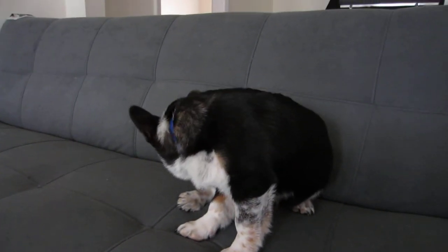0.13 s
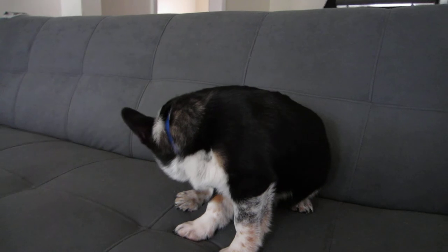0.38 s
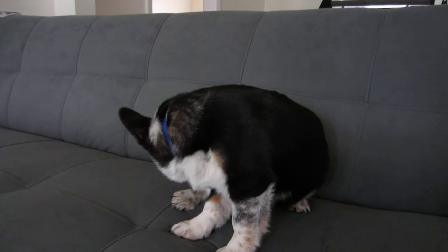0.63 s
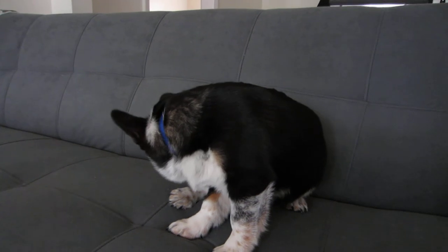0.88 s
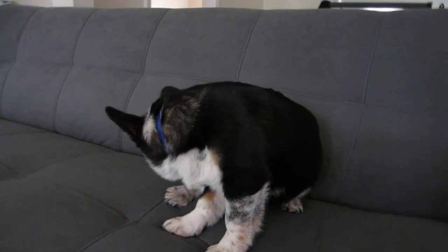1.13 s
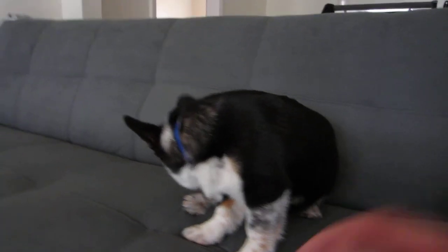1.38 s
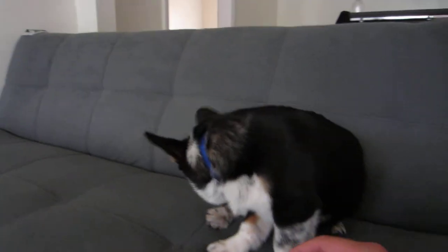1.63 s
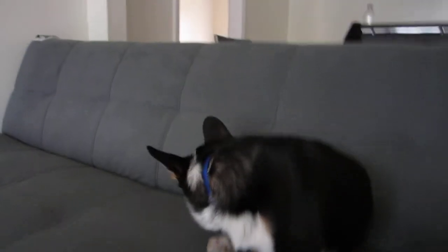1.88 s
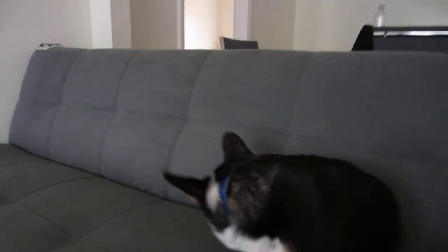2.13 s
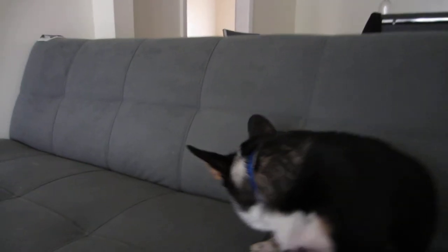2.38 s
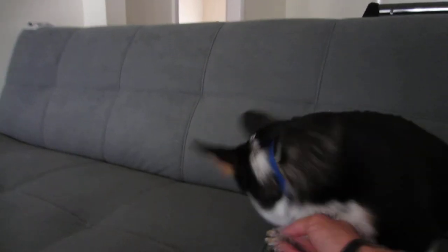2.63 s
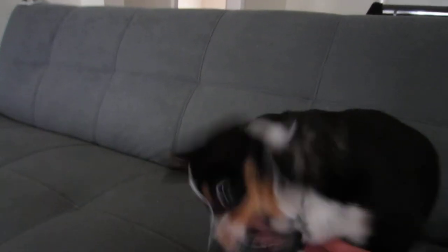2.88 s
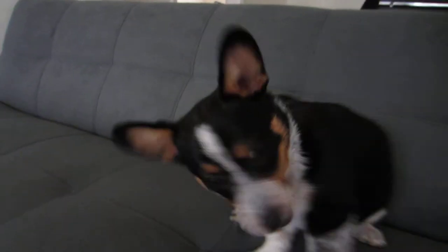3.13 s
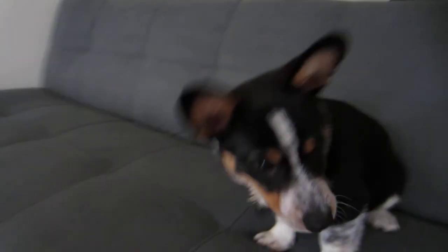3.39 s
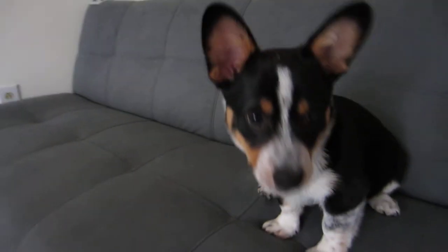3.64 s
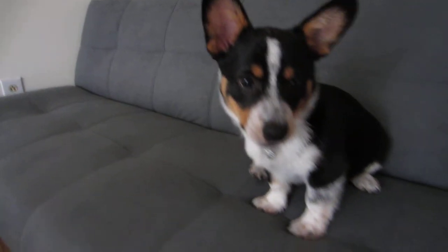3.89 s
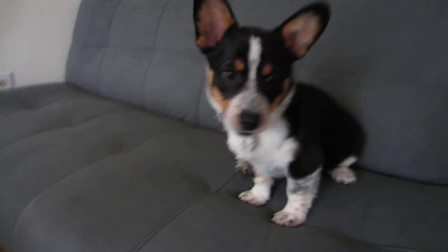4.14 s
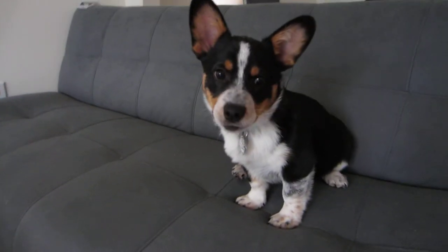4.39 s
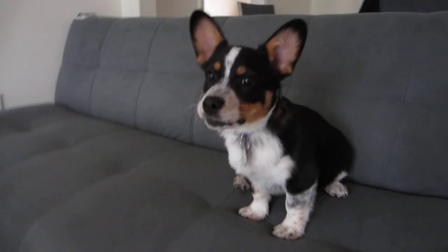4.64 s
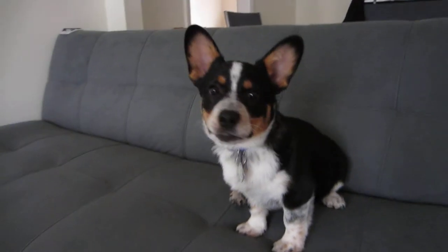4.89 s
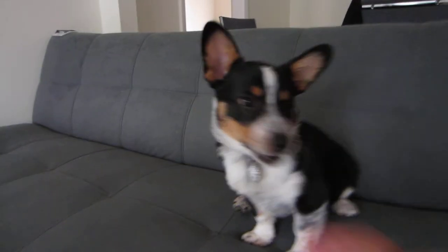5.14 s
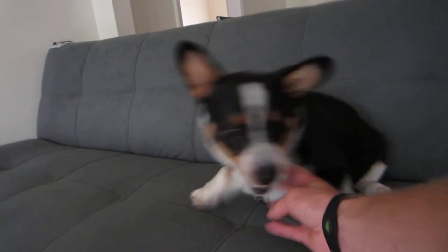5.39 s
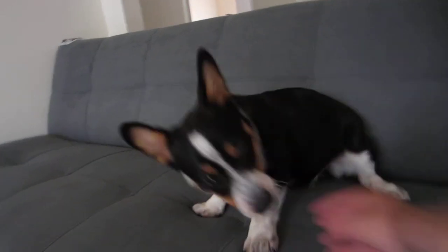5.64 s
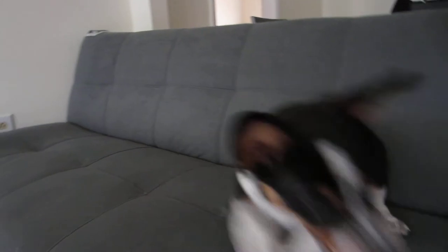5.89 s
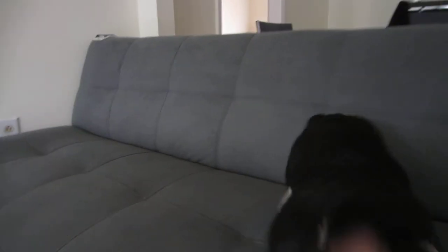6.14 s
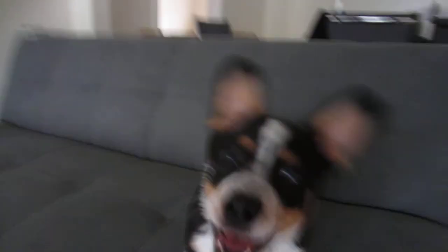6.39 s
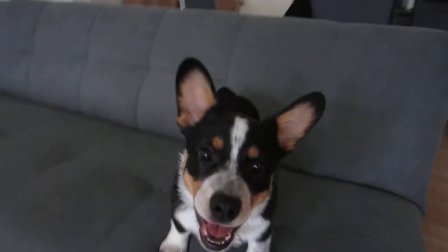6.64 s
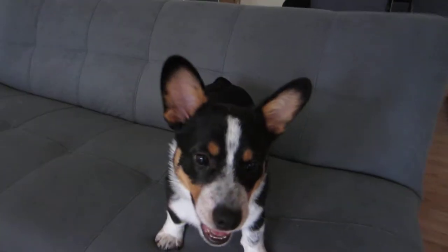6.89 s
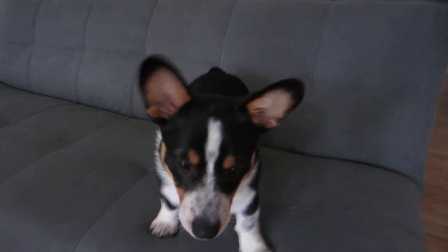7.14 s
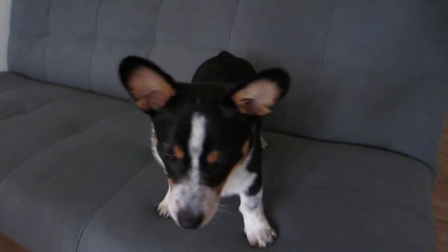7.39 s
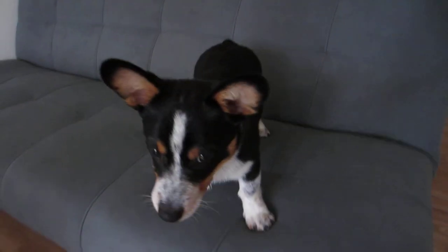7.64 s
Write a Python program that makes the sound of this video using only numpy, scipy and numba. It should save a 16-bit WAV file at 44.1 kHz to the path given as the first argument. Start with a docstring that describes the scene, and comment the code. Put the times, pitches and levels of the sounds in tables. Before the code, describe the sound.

Sharp, very loud hollow clicks break a quiet, faintly humming room, then a puppy romps on a sofa with thumps, tag jingles, huffs and two faint hoarse yips.

```python
"""First a quiet living room with a faint hum, then sharp hollow clicks: a puppy romps on a fabric sofa,
close to a small stereo camera. Cavity tones make the clicks, ringing modes the thumped cushions and the
collar tag. Jittered pulses and breath make two hoarse yips, whines and huffs; filtered noise rustles as
cloth and fur. The room answers with dense reflections, and low rumble comes from handling the camera."""
import sys
import numpy as np
from scipy import signal
from scipy.fft import rfft, irfft
from scipy.io import wavfile
from scipy.ndimage import uniform_filter1d
from numba import njit

SR = 44100
rng = np.random.default_rng(int(sys.argv[2]) if len(sys.argv) > 2 else 0)


def unload_audio(sound):
    """Save the sound as a 16-bit wav file, at the path given as the first command line argument."""
    columns = np.transpose(np.atleast_2d(sound))
    # keep every value between -1 and 1, then stretch to whole-number steps
    steps = np.round(np.clip(columns, -1, 1) * 32767)
    wavfile.write(sys.argv[1], SR, steps.astype(np.int16))


def how_loud(loudness_db):
    """Turn decibels into a plain amplitude multiplier (0 dB gives 1, 20 dB gives 10)."""
    steps = np.asarray(loudness_db, float) / 20
    return 10 ** steps


N = 342657
T = np.arange(N) / SR
LEFT_DB = 3  # left port over right port for most sounds

# sharp clicks: t/s, peak level/dB, low cavity f/Hz, high cavity f/Hz, high over low/dB,
# swell of the high cavity t/ms, crack/dB, echo offset/dB
CLICKS = [(0.507, -37.5, 784, 1702, -10, 0.98, -22, -6), (0.5608, -8.5, 824, 1740, -8.5, 1.34, -6.5, -2.5),
          (0.6863, 0.5, 735, 2714, 7.5, 0.44, 0.5, -3.5), (0.751, -30.5, 350, 2710, -11, 1.6, -20, 7.5),
          (0.796, -27, 377, 2140, -4, 1.5, -6.5, 3), (0.824, 0, 990, 2920, 13, 0.77, 9, 2.5),
          (0.876, -33, 575, 3100, -12, 0.84, -10, 2), (0.9317, -16.5, 762, 1810, -23, 0.64, -2.5, 7.5),
          (1.129, -24, 493, 1620, 0, 0.96, -4.5, -5), (2.114, -34.5, 1000, 1650, -27, 0.9, -24, 4),
          (2.355, -26, 586, 1957, -11, 0.75, -29, -5), (2.466, -32.5, 686, 1068, -4, 1.2, -22, -10),
          (2.633, -19.5, 860, 1720, 1, 0.5, -5, -1), (2.751, -31, 524, 1300, -3, 2.2, -21, 1),
          (2.872, -31, 606, 1680, -5, 1.6, -2, -1.5), (3.5069, -27.5, 604, 1090, -16.5, 0.8, -30, -12),
          (4.915, -22.5, 616, 1900, -3, 0.62, -26, -8), (5.092, -12.5, 455, 1570, -3, 1.28, -18, -8),
          (5.263, -29, 706, 1330, -1.5, 0.59, -4.5, 5), (5.387, -31, 1300, 1720, 5.5, 0.7, -1, 3),
          (5.686, -18.5, 1400, 3000, -9.5, 0.6, -21, 4), (5.865, -38, 682, 1000, -13, 0.91, -22, -10),
          (5.984, -18, 473, 1500, 2.5, 0.43, -8.5, -10), (6.088, -30, 493, 2090, -7.5, 1.4, -24, 0),
          (6.308, -28, 1100, 1660, 6, 0.72, -20, -14), (6.32, -21, 900, 2080, 5.5, 0.69, -5, -4),
          (6.61, -30.5, 503, 1305, -2, 2.1, -17, 1), (6.735, -19.5, 440, 3670, 1, 0.79, 2.5, -8),
          (7.144, -18.5, 1690, 2550, -3, 0.8, -6.5, -3)]
# echoes off nearby surfaces: delay t/s, level/dB before each click's offset
CLICK_ECHOES = [(.0034, -10.5), (.0068, -17), (0.0114, -23)]
# faint thin ticks: t/s, peak level/dB, f/Hz
TICKS = [(0.413, -39.5, 2920), (0.4645, -46, 6500), (0.56, -22, 10700), (0.561, -24, 15000),
         (0.65, -37.5, 3056), (0.751, -28.5, 3700), (0.8734, -32.5, 3200), (1.0983, -45, 3220),
         (1.3335, -43.5, 4930), (1.801, -48, 3220), (3.5497, -39, 3270), (4.472, -48, 5586),
         (5.094, -34.5, 9500), (5.127, -39, 2200), (5.187, -37, 1900), (5.985, -41.5, 3300),
         (6.308, -40, 5140), (6.7336, -22.5, 4800), (6.788, -39.5, 3300), (6.9326, -43.5, 3400)]
# spells of fur crackling over the cloth: from t/s, to t/s, mean peak level/dB, middle f/Hz
CRACKLES = [(0.484, 0.51, -54, 6500), (1.091, 1.133, -50, 6040), (2.762, 2.793, -51, 6030),
            (2.85, 2.935, -49, 5200)]
# blows on the cushions: t/s, peak level/dB, nominal push f/Hz, slap/dB, nominal t60/s
THUMPS = [(1.081, -32, 118.3, -19, 0.15), (1.953, -35, 428, -23.5, 0.41), (2.029, -35.5, 89, -29, 0.16),
          (2.191, -5, 260, -23.5, 0.24), (2.203, -20, 197, -35, 0.18), (3.506, -18.5, 100, -32, 0.24),
          (3.734, -19.5, 320, -27, 0.29), (4.63, -31, 246, -7, 0.61), (4.716, -35, 168, -22, 0.34),
          (4.779, -35.5, 91, -25, 0.23), (4.915, -13, 193, -35, 0.19), (4.927, -25, 190, -37.5, 0.094),
          (5.096, -18, 316, -10, 0.28), (5.272, -24.5, 203.5, -16.5, 0.072), (5.493, -35, 122, -14.5, 0.36),
          (5.864, -27.5, 260, -28, 0.14), (5.9, -34, 228, -20, 0.14), (5.926, -34, 260, -15, 0.16),
          (5.951, -28, 170, -22, 0.076), (5.959, -29, 147, -26, 0.14), (6.021, -31, 150, -23, 0.11),
          (6.03, -29.5, 146, -23, 0.095), (6.493, -25.5, 108, -25.5, 0.16),
          (6.723, -26.5, 233, -22.5, 0.26), (7.147, -26, 430, -8, 0.52)]
# modes of the sofa: f/Hz, level/dB, share of the blow's t60
SOFA_MODES = [(96.1, 2, 1.33), (150, -13, 1.3), (207.5, -5, 0.91), (233, -1.5, 1.22), (260, -7.5, 1.04),
              (295.6, -7.5, 1.53), (350, -5, 1.06), (400, -9, 0.75), (418, 8, 0.25), (526, 5.5, 0.59),
              (697, -6.5, 0.79)]
# collar tag strikes, hard on the ring or soft on fur: t/s, peak level/dB, tick/dB
TAG_STRIKES = [(2.539, -34.5, 2.5), (2.581, -32.5, 2.5), (2.636, -24.5, 5.5), (2.671, -35, 0),
               (2.783, -35.5, 10), (2.8164, -40, 3), (2.928, -50, -11), (2.9684, -44, 9),
               (5.269, -26.5, 1.5), (5.283, -34, 18), (5.3554, -40, -21), (5.3762, -33, 10),
               (5.9439, -52, -2), (6.0097, -37, -3), (6.0336, -41, -27), (6.062, -45, -20),
               (6.095, -51, -17)]
# modes of the metal disc: f/Hz, level/dB, undamped t60/s
TAG_MODES = [(5350, -16, .25), (6390, -16, .15), (7420, -11, .35), (9570, 0, .3), (9625, -2, .5),
             (10200, -12, .15), (13640, -5.5, .35)]
# yips: start t/s, attack t/s, hold t/s, level/dB, pitch f/Hz, mouth f/Hz, mouth level/dB
YIPS = [(5.687, 0.019, 0.016, -32, 463.8, 1693, 0.5), (6.17, 0.023, 0.05, -33, 449.7, 870, 0.5)]
# throat resonances: f/Hz, nominal width/Hz, level/dB
THROAT = [(480, 160, -2), (940, 220, -6), (1400, 450, -5), (1850, 350, -5), (2750, 450, -11),
          (3400, 500, -13), (4200, 600, -17)]
# breathy whines and huffs: start t/s, loudest t/s, end t/s, level/dB, resonance from f/Hz, to f/Hz
HUFFS = [(1.352, 1.578, 2.1, -61, 2750, 2670), (2.662, 2.757, 3.13, -46.5, 1490, 452),
         (3.053, 3.142, 3.34, -42.5, 1860, 503), (6.63, 6.67, 6.75, -48, 1800, 1830),
         (7.143, 7.157, 7.36, -43.5, 1960, 1480), (7.529, 7.584, 7.68, -57, 1410, 1680)]
# how much the puppy moves on the cloth: t/s, creak and cloth drive/dB, fur hiss drive/dB
MOVING = [(0.0, -62, -67), (0.55, -59.5, -59), (0.72, -53.5, -52.5), (0.931, -57.5, -69), (1.101, -62, -63),
          (1.362, -59, -58.5), (1.62, -51.5, -52.5), (2.25, -54, -58), (2.6, -52.5, -54), (2.9, -51, -52.5),
          (3.02, -56, -57), (3.46, -54.5, -58), (3.76, -54, -60.5), (4.52, -57, -58), (5.15, -56, -57.5),
          (5.558, -55, -56), (5.76, -57.5, -71), (5.91, -52, -55), (6.1, -53, -56), (6.22, -50, -51),
          (6.47, -54.5, -56.5), (7.08, -49, -61), (7.33, -58.5, -64.5), (7.77, -59.5, -63.5)]
# creak, cloth and fur hiss in turn: level at rest/dB, dB per dB of movement, drive column of MOVING
RANGES = [(-62, 1.2, 0), (-63, 1.2, 0), (-61, 1.05, 1)]
# cloth settling after a blow, for the same three ranges: level/dB under the blow's peak
SETTLE_DB = [-25.5, -33, -65]
# what the cushion passes in those ranges: points of (f/Hz, level/dB), share unlike left and right
CUSHION = [([(50, 11), (110, 3), (250, 6), (450, -1), (900, -44.5)], 0.3), ([(250, -44), (480, 5),
           (800, 6.5), (1300, 0.5), (2600, -46)], 0.3), ([(800, -37), (1400, -1), (2100, -2.5), (2800, -6),
           (3800, -14.5), (8000, -24), (12000, -53)], 0.46)]
# short low cushion creaks under shifting weight: t/s, peak level/dB, f/Hz
CREAKS = [(1.839, -35.5, 870), (1.998, -40, 365), (6.758, -33, 453), (6.83, -40, 370), (6.874, -40, 285),
          (6.904, -40, 365), (6.917, -39, 358), (6.95, -35, 236), (6.972, -44, 400), (6.997, -33, 464),
          (7.023, -32.5, 500), (7.075, -35, 384), (7.107, -36, 337), (7.178, -36, 350)]
# spells of small creaks while weight shifts: from t/s, to t/s, mean peak level/dB, middle f/Hz
CREAKING = [(1.444, 2.1, -46.5, 316)]
# how fast the room dies away: f/Hz, t60/s
ROOM_T60 = [(100, 0.49), (500, 0.54), (2000, 0.32), (8000, 0.64)]
# spectrum shape of the room noise: f/Hz, relative level/dB
AIR = [(15, -45), (25, -48), (87, -22.5), (123, -3), (175, -36), (293, -13.5), (335, -26), (1130, -17.5),
       (1230, -19), (1370, -9), (1790, -11.5), (1940, -14.5), (2990, -23.5), (7710, -27.5), (16000, -29)]
# mains hum: f/Hz, rms level/dB
HUM = [(120, -64.5)]
# low drone that sets in: t/s, peak level/dB, f/Hz
DRONE = [(6.699, -83, 196.4), (7.2, -57, 197.2), (7.77, -66, 198.5)]
# rumble from handling the camera: t/s, level/dB midway between the port gains
RUMBLE = [(0.0, -71), (1.9, -72.5), (2.15, -65), (2.36, -52), (2.52, -67), (3.4, -65), (3.7, -69),
          (4.35, -71), (5.13, -61), (5.3, -62.5), (5.82, -64), (6.05, -52), (6.25, -64), (7.25, -74),
          (7.77, -65)]
# response of the camera's microphones: f/Hz, level/dB
MIC = [(30, 6), (8000, -3.5), (10500, -11.5), (12000, -26), (13500, -13), (15500, -11.5)]


def clicks():
    """Two small cavities pop over a crack of noise, close surfaces repeat it; short noise bands tick."""
    low_swell = 1.26  # the larger cavity swells this many times slower
    port_lag_s = .00002  # the clicks lie left of the camera
    crack_spectrum = [(300, -4.5), (1000, 1.5), (2200, 7), (5000, 0.0), (7000, -8), (9000, -32.0),
                      (12000, -11.0), (16000, -35.0)]
    out = np.zeros((2, N))
    for s, db, low_hz, high_hz, bright_db, swell_ms, crack_db, echo_db in CLICKS:
        low = burst(low_hz, low_swell * swell_ms / 1000, 0.6, .04)
        high = burst(high_hz, swell_ms / 1000, 0.013, .04)
        crack = unit(colour(rng.standard_normal(len(low)), crack_spectrum))
        crack_shape = fade(0.005, 0.00015, .04) + how_loud(-10.5) * fade(0.038, 0.0026, .04)
        pop = low + how_loud(bright_db) * high + how_loud(crack_db) * crack * crack_shape
        echoes = sum(how_loud(e_db + echo_db) * np.roll(pop, int(lag * SR)) for lag, e_db in CLICK_ECHOES)
        add(out, s - .0006, pop + echoes, db, 4, port_lag_s)
    crackle = spells(CRACKLES, gap_s=.0025, uneven=1.0, spread_db=4, spread_pitch=0.53)
    for s, db, hz in list(TICKS) + crackle:
        tick = band(rng.standard_normal(800), hz, 1500) * fade(0.0079, 0.00045, 1)[:800]
        add(out, s, tick, db, 4.5)
    return out


def burst(hz, peak_s, glide, length):
    """A cavity tone swells to its peak and is choked off; its pitch rises as the cavity changes."""
    u = np.arange(int(length * SR)) / SR / peak_s
    cycles = hz * peak_s * (u + glide * (u * u / 4 - u / 2))
    return u ** 2 * np.exp(2 - 2 * u) * np.sin(2 * np.pi * cycles)


def thumps():
    """A one-cycle push and a slap, then the frame and cushions of the sofa ring on."""
    wobble_db, wobble_rad = 4, .9  # loose padding shakes each mode in level and phase
    ringing_db = -8  # frame against the push
    cloth_spectrum = [(300, 4.0), (900, 9), (2300, 1.0), (3300, -19.0), (7000, -21.5), (10000, -72)]
    out = np.zeros((2, N))
    for s, db, hz, slap_db, t60 in THUMPS:
        push = ring(1.29 * hz, 3 / hz, 0.04 / hz, 0, .6)
        body = np.zeros(len(push))
        for mode_hz, mode_db, share in SOFA_MODES:
            a, b = rng.standard_normal(2)
            shake = walk(89.4, len(push))
            # a push drives the modes near its own nominal pitch hardest
            drive_db = mode_db - 7.1 * abs(np.log2(mode_hz / hz)) + a
            phase = 3 * b + wobble_rad * shake[::-1]
            mode = ring(mode_hz * (1 + 0.017 * b), t60 * share, 0.00088, phase, .6)
            body += how_loud(drive_db + wobble_db * shake) * mode
        cloth = unit(colour(rng.standard_normal(len(push)), cloth_spectrum))
        # the slap is a short smack with a dense tail from the padding
        slap = cloth * (3 * fade(0.012, 0.000076, .6) + how_loud(-1.0) * fade(1.24 * t60, 0.0095, .6))
        body = how_loud(ringing_db) * body / np.max(np.abs(body))
        add(out, s, push / np.max(push) + body + how_loud(slap_db) * slap, db, LEFT_DB)
    return out


def tag():
    """Each strike ticks and rings the small metal disc, which flickers as it turns."""
    turn_db = 4
    fur_damping, damping_per_db = 0.28, .016  # share of t60 left; hard strikes are choked sooner
    out = np.zeros((2, N))
    n = SR // 2
    for s, db, tick_db in TAG_STRIKES:
        left = max(fur_damping - damping_per_db * tick_db, .1)
        rings = np.zeros(n)
        for hz, mode_db, t60 in TAG_MODES:
            a, b = rng.standard_normal(2)
            mode = ring(hz * (1 + 0.00168 * a), t60 * left, 0.00012, 3 * b, 1)[:n]
            rings += how_loud(mode_db + 1.1 * a + turn_db * walk(155, n)) * mode
        noise = band(band(rng.standard_normal(n), 5500, 3100), 6400, 7500)
        tick = unit(noise) * fade(0.018, 0.000077, 1)[:n]
        add(out, s, rings + how_loud(tick_db) * tick, db, 6)
    return out


def voice():
    """The puppy's yips, whines and huffs, a little left of the camera."""
    out = np.zeros(N)
    yips(out)
    huffs(out)
    return lean_left(out)


def yips(out):
    """Jittered pulses with breath gated by each cycle pass through throat and mouth."""
    jitter, shimmer_db, breathiness = .14, 7, 2.3  # pitch scatter, level scatter, breath per roughness
    rough_held, rough_edge = .45, .15  # rougher where the voice starts and fades
    flutter_hz, flutter_db, t60 = 65, 3.5, 0.18  # the hoarse voice throbs
    t = np.arange(int(.2 * SR)) / SR
    for s, attack, hold, db, hz, mouth_hz, mouth_db in YIPS:
        shape = np.clip(t / attack, 0, 1) ** 2 * how_loud(-60 * np.maximum(t - attack - hold, 0) / t60)
        rough = rough_held + rough_edge * (1 - shape)
        phase = np.cumsum(hz * (1 + jitter * rough * walk(309, len(t)))) / SR
        pulses = np.diff(np.exp(10.3 * np.cos(2 * np.pi * phase)), prepend=0)
        pulses = pulses * how_loud(shimmer_db * rough * walk(79.0, len(t)))
        breath = rng.standard_normal(len(t)) * (0.7 + np.cos(np.pi * phase) ** 2)
        source = unit(pulses) + breathiness * rough * unit(breath)
        tract = how_loud(mouth_db) * band(band(source, mouth_hz, 180), mouth_hz, 400)
        for f, width, throat_db in THROAT:
            tract += how_loud(throat_db) * band(band(source, f, 0.97 * width), f, 0.93 * width)
        level = how_loud(db + flutter_db * np.sin(2 * np.pi * flutter_hz * t))
        start = int(s * SR)
        out[start:start + len(t)] += level * shape * unit(tract)


def huffs(out):
    """Breath through a moving resonance: a whine whistles in a narrow throat, a huff leaves an open mouth."""
    whistle_per_octave, open_width_hz, sharpness = .62, 800, 2.8  # sharpness: centre over width
    glide_s, overtone_db, wander_share = .065, -2, .18  # wander: share of pitch once at rest
    start_db, end_db = -9, -18  # against the loudest moment
    for s, loud_s, end_s, db, from_hz, to_hz in HUFFS:
        i = np.arange(int(s * SR), int(end_s * SR))
        n = len(i)
        # the resonance slides to its resting place, whistling while it is still far above
        hz = to_hz + (from_hz - to_hz) * np.clip(1 - (i / SR - s) / glide_s, 0, 1) ** 2
        share = np.clip(whistle_per_octave * np.log2(hz / to_hz), 0, .9)
        if from_hz > 2 * to_hz:
            width, above, wander = to_hz / sharpness, 1.9, wander_share
        else:
            width, above, wander = open_width_hz, 1.6, wander_share / 3
        hz = hz * (1 + wander * np.tanh(walk(32.4, n)) * (1 - share) ** 2)
        breath = rng.standard_normal(n) * how_loud(walk(83.0, n))
        lower = unit(band(band(breath, hz, width), hz, 2 * width))
        upper = unit(band(band(breath, above * hz, 2 * width), above * hz, 400))
        tract = lower + how_loud(overtone_db) * upper
        whistle = np.sqrt(2) * np.sin(2 * np.pi * np.cumsum(hz * (1 + 0.023 * walk(225, n))) / SR)
        shape_db = np.interp(i / SR, [s, loud_s, end_s], [start_db, 0, end_db])
        out[i] += how_loud(db + shape_db) * (np.sqrt(1 - share) * unit(tract) + np.sqrt(share) * whistle)


def rustle():
    """Paws and fur slide on cloth in uneven grains, the cloth settles after blows, the cushion creaks."""
    moving_rest_db, flicker_db, flicker_rate = -59.5, 2.2, 60  # rate in steps per second
    settle_rise_s, settle_t60_s = 0.021, 0.78
    s, *drives = np.transpose(MOVING)
    moving_db = [np.interp(T, s, db) - moving_rest_db for db in drives]
    settling = np.zeros(N)
    for s, db, *_ in THUMPS:
        start = int(s * SR)
        tail = how_loud(db) * fade(settle_t60_s, settle_rise_s, 0.73)[:N - start]
        settling[start:start + len(tail)] += tail
    slips = rng.standard_normal(N) * how_loud(np.minimum(2.18 * rng.exponential(size=N), 14))
    cloth = np.zeros((2, N))
    for (rest_db, slope, column), settle_db, (points, side) in zip(RANGES, SETTLE_DB, CUSHION):
        mid = unit(colour(slips, points) * how_loud(flicker_db * walk(flicker_rate, N)))
        wide = unit(colour(rng.standard_normal(N), points))
        gain = np.hypot(how_loud(rest_db + slope * moving_db[column]), how_loud(settle_db) * settling)
        cloth += gain * (mid + side * wide * np.array([[1], [-1]]))
    out = lean_left(cloth)
    small_creaks = spells(CREAKING, gap_s=.05, uneven=0.28, spread_db=3.7, spread_pitch=0.11)
    for s, db, hz in list(CREAKS) + small_creaks:
        creak = ring(hz / 2, 2.2 / hz, 0.00029, 0, .05) - ring(hz, 7.6 / hz, 0.00042, 0, .05)
        add(out, s, creak, db, LEFT_DB)
    return out


def room(x):
    """Dense reflections, each octave dying at its own rate, mostly alike at the two close ports."""
    t = np.arange(int(.8 * SR)) / SR
    tail = np.zeros((2, len(t)))
    for hz in 63 * 2. ** np.arange(8):
        mid, side = (band(rng.standard_normal(len(t)), hz, 0.97 * hz) for _ in range(2))
        decay = np.exp(-np.log(1000) * t / table(hz, ROOM_T60))
        tail += (mid + 0.36 * side * np.array([[1], [-1]])) * decay
    tail *= np.clip((t - .004) / 0.0034, 0, 1)  # nothing returns in the first 4 ms
    tail = lean_left(tail / np.sqrt(np.sum(tail ** 2) / 2))
    return signal.fftconvolve(x.mean(axis=0)[None], tail, axes=1)[:, :N]


def air():
    """Steady room noise, a wavering mains hum and a low drone of gliding pitch."""
    mid, side = (unit(colour(rng.standard_normal(N), AIR)) for _ in range(2))
    side = colour(side, [(30, 20), (120, 16.0), (500, 19.8), (2000, 8.0), (10000, 0.5)])
    noise = how_loud(-60) * (mid + side * np.array([[1], [-1]]))
    hum = np.zeros(N)
    for hz, db in HUM:
        hum += how_loud(db + 2.8 * walk(5.5, N)) * np.sqrt(2) * np.sin(2 * np.pi * hz * T)
    s, db, hz = np.transpose(DRONE)
    drone = np.sin(2 * np.pi * np.cumsum(np.interp(T, s, hz)) / SR)
    drone = drone * how_loud(np.interp(T, s, db) + 2.9 * walk(37, N))
    return lean_left(noise + hum + drone)


def handling():
    """Low noise rumbles in the camera's two ports, partly in opposition."""
    spectrum = [(12, -16), (25, -4.5), (60, -16.5), (100, -8), (200, -61)]
    rumble = unit(colour(rng.standard_normal((2, N)), spectrum))
    rumble[1] -= 0.39 * rumble[0]
    return rumble * how_loud(np.interp(T, *np.transpose(RUMBLE)) + np.array([[3], [-3]]))


def table(hz, points):
    """Read (f/Hz, value) points on a log-frequency axis."""
    p = np.array(points, float)
    return np.interp(np.log(np.maximum(hz, 1)), np.log(p[:, 0]), p[:, 1])


def colour(x, points):
    """Filter by a (f/Hz, level/dB) spectrum."""
    n = x.shape[-1]
    return irfft(rfft(x) * how_loud(table(np.fft.rfftfreq(n, 1 / SR), points)), n)


def unit(x):
    """Scale to rms 1."""
    return x / np.sqrt(np.mean(x ** 2))


def ring(hz, t60, rise, phase, length):
    """One decaying mode with a soft start."""
    t = np.arange(int(length * SR)) / SR
    shape = (1 - np.exp(-t / max(rise, 1e-5))) * np.exp(-np.log(1000) * t / max(t60, 1e-3))
    return shape * np.sin(2 * np.pi * hz * t + phase)


def fade(t60, rise, length):
    """The envelope of a mode alone, without its tone."""
    return ring(0, t60, rise, np.pi / 2, length)


def spells(rows, gap_s, uneven, spread_db, spread_pitch):
    """Scatter small events over each spell in time, level and pitch."""
    events = []
    for start, end, db, hz in rows:
        a, b, c = rng.standard_normal((40, 3)).T
        times = start + gap_s * (np.arange(40) + uneven * a)
        drawn = zip(times, db + spread_db * b, hz * np.exp(spread_pitch * c))
        events += [event for event in drawn if event[0] < end]
    return events


def lean_left(x):
    """Weight a sound towards the left port by LEFT_DB."""
    return x * how_loud(np.array([[LEFT_DB], [-LEFT_DB]]) / 2)


def add(out, s, x, db, pan_db, lag_s=0.):
    """Place a sound with its peak level and side; it may reach the right port a little late."""
    i = int(s * SR)
    x = x[:N - i] / np.max(np.abs(x))
    ports = np.array([x, np.roll(x, round(lag_s * SR))])
    out[:, i:i + len(x)] += ports * how_loud(db + np.array([[pan_db], [-pan_db]]) / 2)


@njit
def svf(x, hz, width):
    """Band-pass with a moving centre, gain 1 there."""
    y, b, l = np.empty(len(x)), 0., 0.
    for i in range(len(x)):
        g, k = np.tan(np.pi * hz[i] / SR), width / hz[i]
        v = (b + g * (x[i] - l)) / (1 + g * (g + k))
        b, l, y[i] = 2 * v - b, l + 2 * g * v, k * v
    return y


def band(x, hz, width):
    """Band-pass at a fixed or moving centre."""
    return svf(x, hz + np.zeros(len(x)), 1. * width)


def walk(rate, n):
    """Slow smooth chance of spread near 1, with rate new values per second."""
    k = max(int(SR / rate), 2)
    steps = np.repeat(rng.standard_normal(n // k + 1), k)
    return 1.38 * uniform_filter1d(uniform_filter1d(steps, k), k)[:n]


def scene():
    """Near sounds, their echo in the room, and the background."""
    sharp, dull, pup = clicks() + tag(), thumps(), voice()
    wet = room(how_loud(-18.5) * sharp + how_loud(-13) * dull + how_loud(-9) * pup)
    return sharp + dull + pup + wet + rustle() + air()


def band_limit(x):
    """A steep low-pass at the top of the band."""
    return signal.sosfilt(signal.butter(12, 16670, fs=SR, output="sos"), x)


def record(dry):
    """The camera thins the bass, rumbles, dips near 12 kHz, rounds the loudest peaks and cuts the top."""
    full_scale = 1.1
    thin = signal.sosfilt(signal.butter(2, 128, "high", fs=SR, output="sos"), dry)
    heard = colour(thin + handling(), MIC)
    rounded = full_scale * np.tanh(heard / full_scale)
    mix = signal.sosfilt(signal.ellip(8, .2, 70, 16300, fs=SR, output="sos"), rounded)
    return band_limit(mix)


dry = scene()
out = record(dry)
unload_audio(out)
```